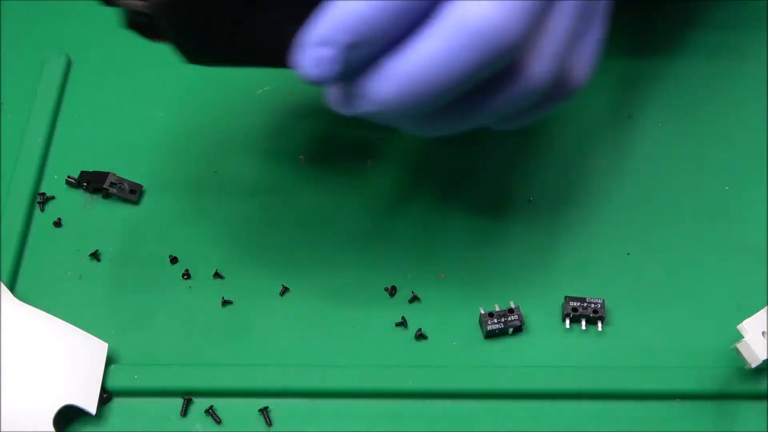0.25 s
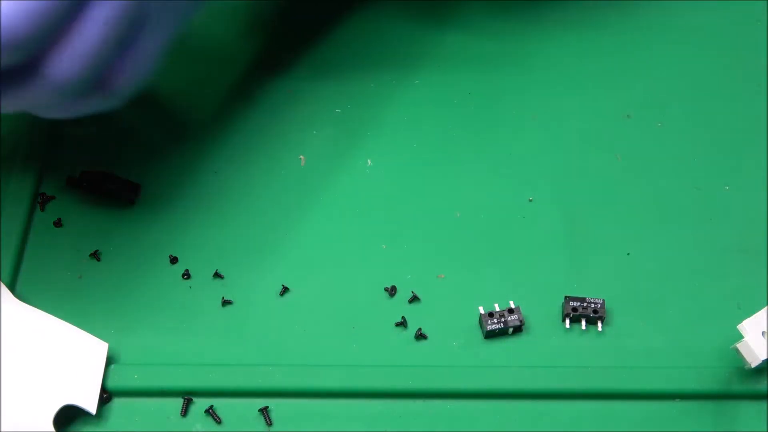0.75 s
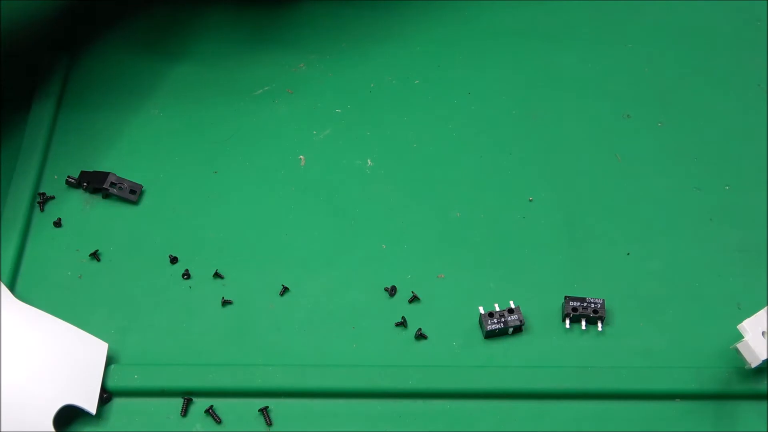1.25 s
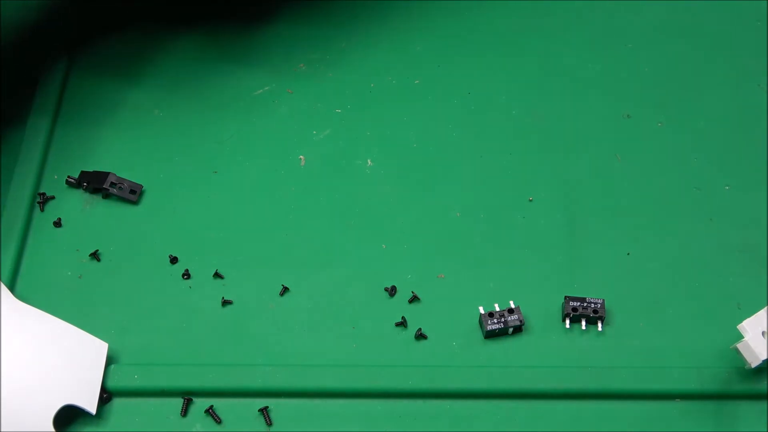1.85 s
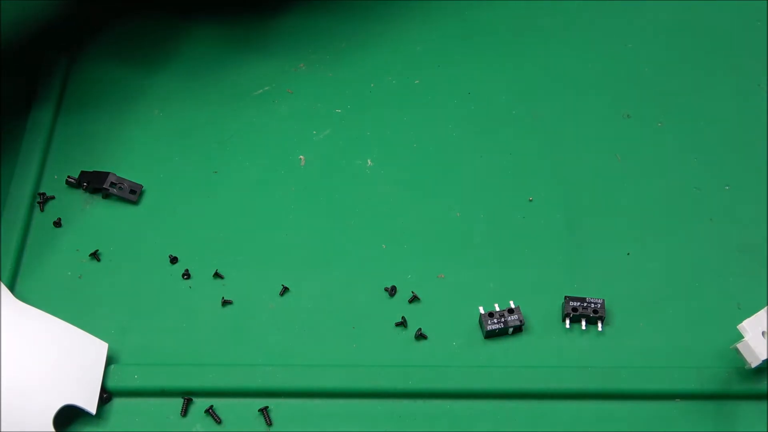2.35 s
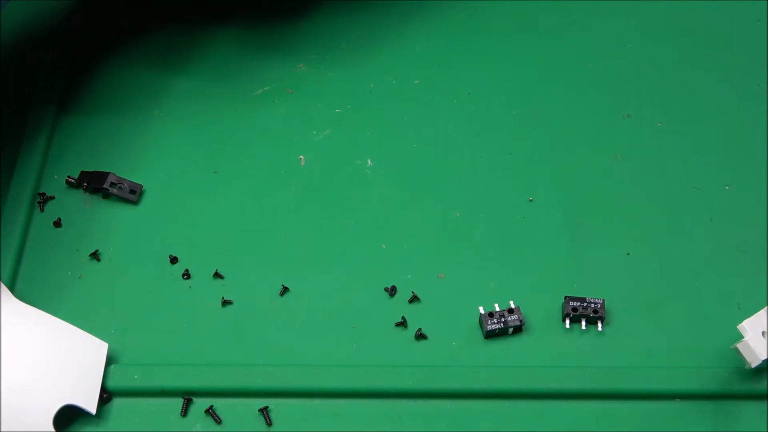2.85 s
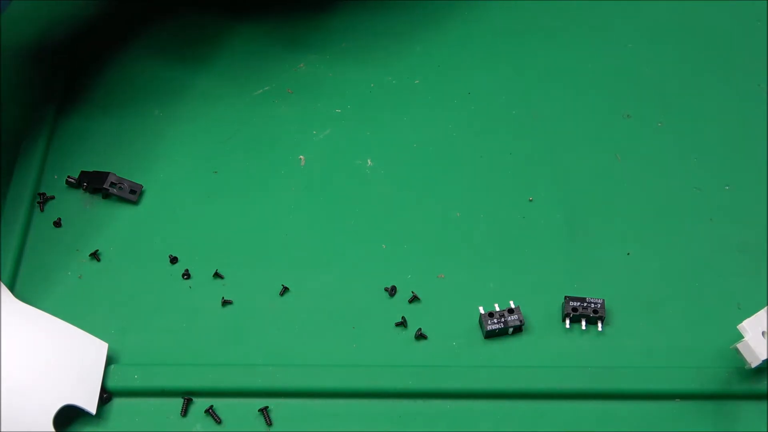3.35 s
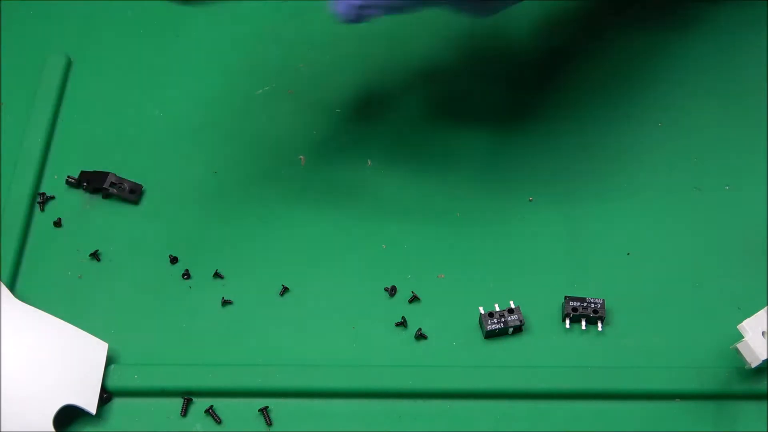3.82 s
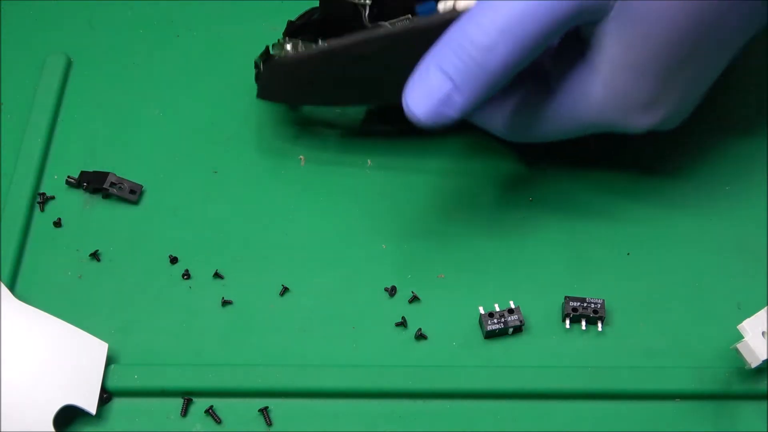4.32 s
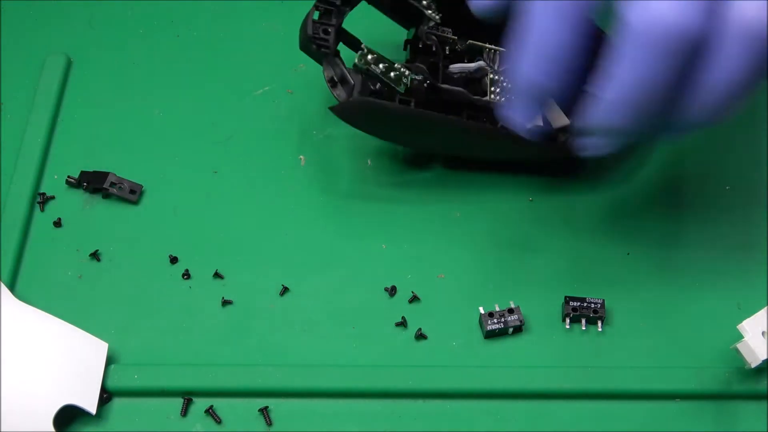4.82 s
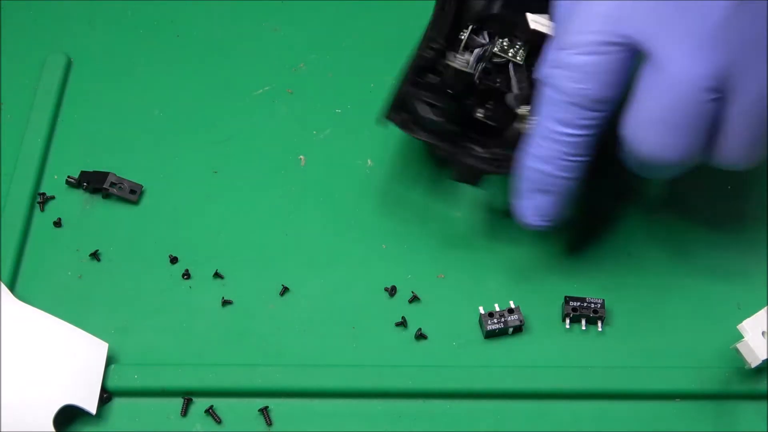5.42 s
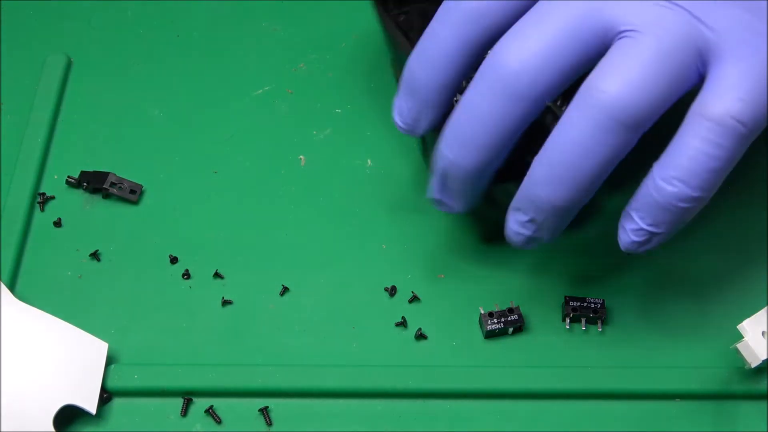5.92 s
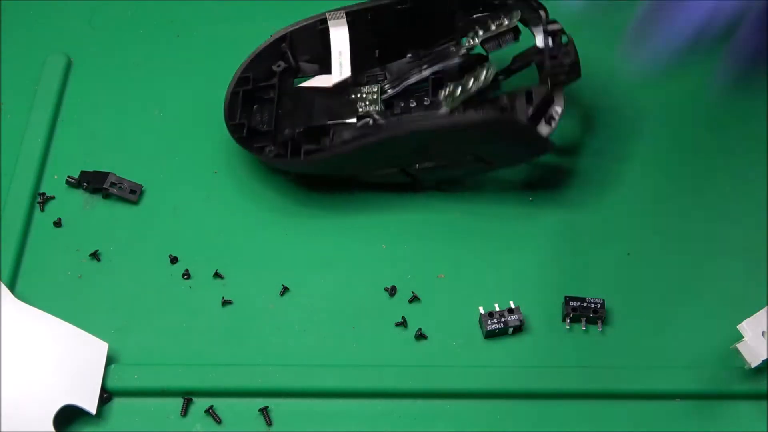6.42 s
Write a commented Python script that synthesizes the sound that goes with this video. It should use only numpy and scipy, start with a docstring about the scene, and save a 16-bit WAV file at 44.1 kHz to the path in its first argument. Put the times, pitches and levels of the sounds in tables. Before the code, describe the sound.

Close-up at a repair bench in a small, fairly dry room: light plastic clatter and glove rustle over a soft fan drone, one trigger click, then a bright, forceful rush of air whistling through plastic cavities. The jet stops sharply, leaving the background briefly subdued. Knocks, taps, short rubbing scrapes and thin high glove squeaks follow as the shell is handled, ending with a crisp click.

```python
"""Air jet at a repair bench

A fan hums in a small room while gloved hands turn an open plastic shell, which ticks, knocks and squeaks.
A compressed-air nozzle blows through the shell for over two seconds: noise coloured by drifting cavities.
Contacts are crackle bursts that ring shell modes; gloves are grainy noise; the fan is noise with bands.
Gain control ducks the room under loud sound and lets it return slowly."""
import sys
import numpy as np
from scipy import signal
from scipy.fft import rfft, irfft, next_fast_len
from scipy.io import wavfile
from scipy.ndimage import uniform_filter1d, map_coordinates

SR = 44100
rng = np.random.default_rng(int(sys.argv[2]) if len(sys.argv) > 2 else 0)


def amp(db):
    return 10 ** (np.asarray(db, float) / 20)


def persist_wave(psi):
    """Save psi, clipped to +-1, as 16-bit WAV."""
    counts = np.round(np.clip(psi, -1, 1) * 32767).astype(np.int16)
    wavfile.write(sys.argv[1], SR, np.atleast_2d(counts).T)


N = 294147


def unit(x):
    """Scales to rms 1."""
    return x / np.sqrt(np.mean(x ** 2) + 1e-20)


def along(points, hz):
    """Interpolates (Hz, value) points on a log frequency axis."""
    f, v = np.transpose(points)
    return np.interp(np.log(hz + 1), np.log(f + 1), v)


def filtered(x, response):
    """Multiplies the spectrum of x by a response of frequency."""
    m = next_fast_len(x.shape[-1] + 8192)
    spectrum = rfft(x, m) * response(np.fft.rfftfreq(m, 1 / SR))
    return irfft(spectrum, m)[..., :x.shape[-1]]


def peak(hz, centre_hz, width_hz):
    """Power of one resonance, 1 at its centre."""
    return 1 / (1 + (2 * (hz - centre_hz) / width_hz) ** 2)


def smooth_noise(n, samples):
    """Random curve of rms 1, smoothed over the given samples."""
    return unit(uniform_filter1d(rng.standard_normal(n), size=samples))


def patches(shape, hz_bins, frames):
    """Smooth random field of rms 1 over frequency and time."""
    over_hz = uniform_filter1d(rng.standard_normal(shape), round(hz_bins), 0)
    return unit(uniform_filter1d(over_hz, round(frames), 1))


def wobble(t, knots_per_s):
    """Smooth random curve through independent knots."""
    return map_coordinates(rng.standard_normal(300), [np.clip(t * knots_per_s, 0, 299)])


def lean(pair, side):
    """Left-right balance by frequency, keeping the mean of both gains."""
    def gains(hz):
        left_over_right_db = along(side, hz)
        return np.array([2 / (1 + amp(-left_over_right_db)), 2 / (1 + amp(left_over_right_db))])
    return filtered(pair, gains)


def stereo(pair, side, alike):
    """Mixes two unrelated noises to the given likeness and balance."""
    def shares(hz):
        turn = np.arccos(np.clip(along(alike, hz), 0, 1)) / 2
        return np.array([np.cos(turn), np.sin(turn)])
    common, opposed = filtered(pair, shares)
    return lean(np.array([common + opposed, common - opposed]), side)


# Balance of the room noises. Each row: frequency in Hz, left over right in dB.
ROOM_BALANCE = [(60, -5.5), (130, -4), (290, 8.5), (640, 12.5), (1410, 7), (3100, 1.5), (6820, -0.5),
                (15000, 0)]
# Left-right correlation of the room noises. Each row: frequency in Hz, likeness 0 to 1.
ROOM_LIKENESS = [(60, 0.98), (240, 0.93), (950, 0.81), (3770, 0.94), (15000, 0.32)]
# Airflow and room colour. Each row: frequency in Hz, relative level in dB.
FAN_AIRFLOW = [(15, -29.5), (25, -21.5), (53, -24.5), (134, -3.5), (256, -1), (326, -9.5), (427, -10.5),
               (516, -19), (659, -19.5), (911, -38), (1020, -27), (1370, -36.5), (7310, -52), (14000, -62),
               (16000, -59)]
# Unsteady fan tones. Each row: centre in Hz, width in Hz, rms level in dB.
FAN_BANDS = [(57.4, 17, -41.5), (82.7, 20, -42), (115.2, 11.5, -39), (182.4, 50, -38), (242.7, 5.3, -40),
             (258, 27, -35.5), (412, 54, -46), (464, 16, -48), (6850, 90, -73)]


def fan():
    """Broad airflow noise with narrow bands where blades and housing sing unsteadily."""
    airflow = filtered(rng.standard_normal((2, N)), lambda hz: amp(along(FAN_AIRFLOW, hz)))
    hum = amp(-30) * unit(airflow)
    for centre_hz, width_hz, db in FAN_BANDS:
        band = filtered(rng.standard_normal((2, N)), lambda hz: peak(hz, centre_hz, width_hz))
        hum += amp(db) * unit(band)
    return stereo(hum, ROOM_BALANCE, ROOM_LIKENESS)


# Activity of the gloved hands. Each row: time in seconds, rustle level in dB.
HAND_ACTIVITY = [(0, -54.5), (.23, -65), (.45, -55.5), (.6, -50.5), (.69, -38.5), (.86, -58), (1.15, -52.5),
                 (3.7, -47), (3.98, -65), (4.23, -52.5), (4.5, -57.5), (5.0, -55.5), (5.35, -60),
                 (5.6, -60), (5.92, -53), (6.29, -59.5), (6.61, -51.5)]
# Rustle colour. Each row: frequency in Hz, relative level in dB.
GLOVE_COLOUR = [(1200, -28), (2800, 3.5), (5000, -2), (9000, -4), (14000, -17), (16500, -4)]
# Colour of the scrape on the shell. Each row: frequency in Hz, relative level in dB.
SCRAPE_COLOUR = [(500, -27), (850, 7.5), (1100, -8), (1450, -5.5), (2100, -5), (2800, -20), (4000, -27)]


def rustle():
    """Gloves rustle, crinkle and scrape over the shell: grainy noise that follows the hands."""
    mean_scrape_db, scrape_follows = -52.5, 0.8  # share of the activity swings
    crinkles_per_s, crinkle_over_rustle_db, crinkle_spread_db, crinkle_t60_s = 18, 7, 4.5, 0.007
    now = np.arange(N) / SR
    busy_db = np.interp(now, *np.transpose(HAND_ACTIVITY))
    scrape_db = mean_scrape_db + scrape_follows * (busy_db - busy_db.mean())
    crinkle_db = crinkle_over_rustle_db + crinkle_spread_db * rng.standard_normal(N)
    starts = (rng.random(N) < crinkles_per_s / SR) * amp(crinkle_db)
    crinkles = signal.fftconvolve(starts, amp(-60 * now[:2000] / crinkle_t60_s))[:N]
    layers = ((busy_db, GLOVE_COLOUR, 1.6, crinkles), (scrape_db, SCRAPE_COLOUR, 3, 0.27 * crinkles))
    out = 0
    for db, colour, grain_db, ticks in layers:
        grain = amp(grain_db * smooth_noise(N, 400))
        noise = unit(filtered(grain * rng.standard_normal((2, N)), lambda hz: amp(along(colour, hz))))
        out = out + amp(db) * (1 + ticks) * noise
    return stereo(out, ROOM_BALANCE, ROOM_LIKENESS)


# Rubber on plastic. Each row: start in seconds, end in seconds, start pitch in Hz, end pitch in Hz,
# relative level in dB.
GLOVE_SQUEAKS = [(.32, 0.357, 4450, 4600, -64), (0.348, 0.398, 4550, 4820, -59),
                 (5.88, 5.94, 8860, 8800, -59), (5.948, 6.017, 8720, 8700, -54)]


def squeaks():
    """Short thin tones of a glove slipping, gliding with a wavering pitch."""
    out = np.zeros(N)
    for start_s, end_s, start_hz, end_hz, db in GLOVE_SQUEAKS:
        n = round((end_s - start_s) * SR)
        pitch_hz = np.linspace(start_hz, end_hz, n) + 60 * smooth_noise(n, 90)
        tone = np.sin(2 * np.pi * np.cumsum(pitch_hz) / SR)
        out[round(start_s * SR):][:n] += amp(db + 7) * np.hanning(n) ** 0.4 * tone
    return out * amp([[1.5], [-1.5]])  # left 3 dB over right


# Balance of contacts, low swells and bursts. Each row: frequency in Hz, left over right in dB.
NEAR_BALANCE = [(200, 2.5), (700, 15.5), (1500, 7.5), (3000, 3.5), (8000, 4.5)]


def bursts(table, grit_db):
    """Gritty band of noise that swells in, holds and stops quickly."""
    out = np.zeros(N)
    for start_s, end_s, centre_hz, width_hz, db in table:
        n = round((end_s - start_s) * SR)
        u = np.linspace(0, 1, n)
        noise = unit(filtered(rng.standard_normal(n), lambda hz: peak(hz, centre_hz, width_hz)))
        noise = unit(noise * amp(grit_db * smooth_noise(n, 150)))
        envelope = np.sqrt(np.minimum(5 * u, 1) * np.minimum(8.4 * (1 - u), 1))
        out[round(start_s * SR):][:n] += amp(db) * envelope * noise
    return lean(np.array([out, out]), NEAR_BALANCE)


# The shell rubbed by a glove or dragged over the mat. Each row: start in seconds, end in seconds,
# centre in Hz, width in Hz, level before the envelope in dB.
SHELL_DRAGS = [(.47, .53, 1990, 3500, -45.5), (.925, .97, 1070, 900, -45), (4.48, 4.56, 900, 713, -50),
               (5.73, 5.79, 5340, 300, -64), (5.812, 5.93, 1070, 200, -43), (5.885, 5.925, 2060, 450, -42),
               (5.86, 6.0, 2800, 4000, -57)]


def drags():
    """Friction of the shell on glove or mat: gritty bands of noise."""
    return bursts(SHELL_DRAGS, grit_db=3.5)


# Short low swells, some perhaps of the fan hum. Each row: time in seconds, level in dB, pitch in Hz,
# t60 in seconds.
LOW_SWELLS = [(0.442, -18, 390, 0.086), (0.655, -18.5, 303.4, 0.13), (0.79, -5, 258, 0.02),
              (4.698, -14.5, 172, 0.096), (5.99, -15, 248, 0.091)]


def low_swells():
    """Each short low swell is one sine that rises at once and decays."""
    out, t = np.zeros(N + SR), np.arange(SR // 5) / SR
    for start_s, db, hz, t60_s in LOW_SWELLS:
        envelope = amp(db - 60 * t / t60_s) * (1 - np.exp(-t / 0.0011))
        out[round(start_s * SR):][:len(t)] += envelope * np.sin(2 * np.pi * hz * t)
    return lean(np.array([out[:N], out[:N]]), NEAR_BALANCE)


# Contacts on the shell and the trigger. Each row: time in seconds, level in dB,
# knock peak over that level in dB, knock centre in Hz, tick centre in Hz.
SHELL_CONTACTS = [(0.048, -35, -16, 970, 7400), (0.134, -27.5, -8, 751, 8850),
                  (0.153, -34.5, -7, 834, 3490), (0.4003, -46, 11, 2350, 3530),
                  (0.473, -31.5, 2.5, 1250, 3450), (0.5877, -45.5, 11, 2140, 3680),
                  (0.623, -14, -8.5, 1950, 6660), (0.647, -15.5, -2.5, 2260, 3440),
                  (0.6549, -9, -2, 1300, 5840), (0.6872, -20.5, 1, 1240, 5660),
                  (0.7147, -33.5, 16, 985, 3710), (0.7911, -38.5, 13, 1000, 4910),
                  (0.8929, -34, 0, 840, 7500), (0.9193, -35.5, 4, 990, 3730),
                  (1.0158, -9.5, -13, 2200, 4630), (3.5573, 0.5, -11, 1550, 3320),
                  (3.9068, -12, -36, 824, 10000), (3.977, -26.5, -17, 1380, 4010),
                  (4.2026, -12.5, -5, 1220, 3180), (4.2277, -10.5, 2.5, 1720, 3490),
                  (4.3099, -30.5, 9.5, 1190, 3490), (4.3325, -14, 2.5, 980, 5580),
                  (4.362, -11, -22, 1910, 7100), (4.412, -18.5, -26, 1190, 3520),
                  (4.6651, -26, 1.5, 2200, 3700), (4.6836, -23.5, 1, 1240, 9400),
                  (4.767, -26, -21, 810, 3600), (5.472, -27, -28, 1190, 3360),
                  (5.6241, -31, -6.5, 997, 3420), (5.73, -37, 6, 1090, 5600), (5.8095, -20, -8, 1050, 5520),
                  (5.8666, -38, 3, 999, 3280), (5.9342, -17.5, -7, 2280, 4130),
                  (5.9603, -18.5, -17, 1210, 7700), (5.9867, -25, -3.5, 1020, 8250),
                  (6.0781, -28, -27, 851, 5810), (6.2208, -24.5, -19, 953, 3450),
                  (6.4414, -24, -22, 830, 4300), (6.4665, -28, -11, 1040, 4640),
                  (6.6409, -9.5, -14, 2520, 3300)]
# Modes of the plastic shell. Each row: frequency in Hz, relative level in dB, t60 in seconds.
SHELL_MODES = [(600, 5.5, 0.017), (860, -9, 0.023), (1006, -2, 0.019), (1200, -2.5, 0.025),
               (1500, -2, 0.008), (1880, 5, 0.0082), (2046, 9.5, 0.0084), (2370, 9.5, 0.0082),
               (2830, 4, 0.013), (3040, -1, 0.011), (3600, -24, .012)]


def contacts():
    """Each contact is a burst of crackle that also rings the shell modes near the spot it strikes."""
    even_t60_s, lingers_db_per_db = 0.031, 0.17  # t60 at 0 dB of knock; blunter contacts last longer
    rattle_db, rattle_t60_s = -23.5, 0.21  # loose parts chatter on
    yield_s = 0.003  # the shell yields before it rings in full
    out, t = np.zeros(N + SR), np.arange(SR // 5) / SR
    n = len(t)
    for start_s, db, knock_db, knock_hz, tick_hz in SHELL_CONTACTS:
        chatter = amp(rattle_db - 60 * t / rattle_t60_s + 2.9 * smooth_noise(n, 120))
        t60_s = even_t60_s * amp(lingers_db_per_db * knock_db)
        fade = (amp(-60 * t / t60_s) + chatter) * (1 - np.exp(-t / 0.000077))
        top_hz = 24000 * amp(-0.3 * (knock_db + 12))  # blunt knocks crackle duller

        def colour(hz):
            tick = 1.03 + peak(hz, tick_hz, 0.26 * tick_hz)
            tick = tick * peak(hz, tick_hz, 3.7 * tick_hz)
            return tick * (1 - peak(hz, 0, 4600)) ** 2 * peak(hz, 0, top_hz)

        crackle = unit(filtered(rng.standard_normal(n), colour)) * fade
        ring = np.zeros(n)
        for hz, mode_db, mode_t60_s in SHELL_MODES:
            decay = amp(mode_db + rng.normal(0, 1.5) - 60 * t / mode_t60_s)
            ring += decay * (0.036 + peak(hz, knock_hz, 490)) * np.sin(2 * np.pi * hz * t)
        # the modes are fed for as long as the contact lasts
        force = rng.standard_normal(n) * fade ** 1.28 * (1 - np.exp(-t / yield_s))
        knock = signal.fftconvolve(force, ring)[:n]
        knock = knock / np.abs(knock).max()
        out[round(start_s * SR):][:n] += amp(db) * (0.29 * crackle + amp(knock_db) * knock)
    return lean(np.array([out[:N], out[:N]]), NEAR_BALANCE)


# Short narrow hisses of air, in order: valve half open, jet meeting the rim, jet meeting a rib,
# valve half shut, last gulp as it seats. Each row: start in seconds, end in seconds, centre in Hz,
# width in Hz, level before the envelope in dB.
AIR_PUFFS = [(1.166, 1.2, 3760, 400, -29.5), (1.205, 1.29, 700, 704, -24.5), (2.625, 2.72, 593, 600, -24.5),
             (3.525, 3.552, 3810, 407, -10.5), (3.556, 3.564, 1640, 490, -7.5)]


def puffs():
    """Air at the half-open valve and on edges of the shell hisses in narrow bands."""
    return bursts(AIR_PUFFS, grit_db=3.0)


# Course of the jet. Each row: time in seconds, level in dB,
# relative low splash on near faces in dB.
JET_COURSE = [(1.175, -17, -7), (1.22, -12, 2.5), (1.33, -6, 0.5), (1.6, -6.5, 0.5), (2.1, -6, -2),
              (2.35, -7, 1.5), (2.55, -6, -1), (2.82, -4.5, 7.5), (3.1, -4.5, 3.5), (3.3, -4.5, 1),
              (3.53, -5, 2.5)]
# Free jet colour. Each row: frequency in Hz, relative level in dB.
FREE_JET = [(150, -61), (600, -50), (1300, -9), (4000, -16.5), (9000, -40), (13000, -25), (14800, -26),
            (16000, -37)]
# Large cavities. Each row: centre in Hz, width in Hz, relative level in dB.
LARGE_CAVITIES = [(1708, 410, -3), (2597, 140, -2), (3160, 1140, -10.5), (4270, 690, -14)]
# Small cavities. Each row: centre in Hz, width in Hz, relative level in dB.
SMALL_CAVITIES = [(5550, 340, -4), (6420, 750, -4.5)]
# Fine slots. Each row: centre in Hz, width in Hz, relative level in dB.
FINE_SLOTS = [(11170, 560, -8), (11750, 770, -8.5), (13460, 830, -11)]
# Balance of the jet. Each row: frequency in Hz, left over right in dB.
JET_BALANCE = [(60, -13.5), (150, 8), (380, 9.5), (950, 12.5), (2380, 10), (5980, 6), (15000, 10.5)]
# Left-right correlation of the jet. Each row: frequency in Hz, likeness 0 to 1.
JET_LIKENESS = [(60, 0.38), (240, 0.67), (950, 0.6), (3770, 1), (8500, 0.76), (15000, 0.5)]


def jet():
    """Turbulent air rings the cavities that the nozzle sweeps over; their strengths drift and flutter."""
    open_s, shut_s, open_db_per_s, shut_db_per_s = 1.171, 3.549, 4000, 1500  # valve
    drift_db, knots_per_s = 1.2, 10  # the nozzle wanders
    whistle_centre_hz, wander_hz = 8490, 263  # edge whistle
    hz, t, z = signal.stft(rng.standard_normal((2, N)), SR, nperseg=512)
    hz = hz[:, None]
    s, level_db, splash_db = np.transpose(JET_COURSE)
    splash_db = np.interp(t, s, splash_db) + drift_db * wobble(t, knots_per_s)
    large_db = 1 + drift_db * wobble(t, knots_per_s)
    small_db = 1 + drift_db * wobble(t, knots_per_s)
    whistle_hz = whistle_centre_hz + wander_hz * wobble(t, knots_per_s)

    def modes(table):
        return sum(amp(2 * db) * peak(hz, centre_hz, width_hz) for centre_hz, width_hz, db in table)

    # amp(2 * db) is a power ratio
    power = amp(2 * along(FREE_JET, hz)) + modes(FINE_SLOTS)
    power = power + amp(2 * -1) * peak(hz, whistle_hz, 1680) ** 1.97
    power = power + amp(2 * large_db) * modes(LARGE_CAVITIES)
    power = power + amp(2 * small_db) * modes(SMALL_CAVITIES)
    power = power * (1 - peak(hz, 0, 2430)) ** 2
    reached = np.clip((t - 1.2) / 0.017, 0, 1)  # the jet swings onto the shell just after it opens
    splash = peak(hz, 720, 1500) ** 2 * (1 - peak(hz, 0, 510))
    power = power + reached * amp(2 * (splash_db - 15.5)) * splash
    flutter_db = 1.55 * patches(z.shape[1:], 4, 10) + 0.92 * patches(z.shape[1:], 8.6, 4)
    air = signal.istft(z * np.sqrt(power) * amp(flutter_db), SR, nperseg=512)[1]
    air = unit(air[:, :N])
    now = np.arange(N) / SR
    valve_db = open_db_per_s * np.maximum(open_s - now, 0) + shut_db_per_s * np.maximum(now - shut_s, 0)
    return amp(np.interp(now, s, level_db) - valve_db) * stereo(air, JET_BALANCE, JET_LIKENESS)


# Reverberation. Each row: frequency in Hz, t60 in seconds.
ROOM_DECAY = [(300, 0.21), (2000, 0.16), (6000, 0.14), (14000, 0.07)]


def room(x):
    """Each frequency of the room's answer dies at its own speed; a fresh tail every 0.3 s."""
    out, step = np.zeros((2, N + SR)), round(0.3 * SR)
    for i in range(0, N, step):
        hz, t, z = signal.stft(rng.standard_normal((2, SR // 2)), SR, nperseg=256)
        decay = amp(-60 * t / along(ROOM_DECAY, hz)[:, None])
        tail = signal.istft(z * decay, SR, nperseg=256)[1]
        tail[1] = 0.75 * tail[0] + 0.65 * tail[1]  # sides partly alike
        wet = signal.fftconvolve(x[:, i:i + step], tail / np.linalg.norm(tail[0]), axes=1)
        out[:, i + 200:][:, :wet.shape[1]] += wet  # delayed by 200 samples
    return out[:, :N]


def scene():
    """Hands, low swells and nozzle in the room, over the fan."""
    background = fan() + rustle()
    hands_and_swells = squeaks() + drags() + low_swells() + contacts()
    air = puffs() + jet()
    echo = room(amp(-13.5) * air + amp(-6.5) * hands_and_swells)
    return background + hands_and_swells + air + echo


def follow(want, attack_s, release_s):
    """Follower on 1 ms steps that rises with one time constant and falls with another."""
    out, now = np.zeros(len(want)), 0
    up, down = np.exp(-0.001 / attack_s), np.exp(-0.001 / release_s)
    for i, w in enumerate(want):
        now = w + (now - w) * (up if w > now else down)
        out[i] = now
    return out


def band_limit(x):
    """A steep low-pass at the top of the band."""
    return signal.sosfilt(signal.butter(12, 16500, fs=SR, output="sos"), x)


# Treble limit of the whole sound, hiss included. Each row: frequency in Hz, gain in dB.
TREBLE_LIMIT = [(13500, 1), (15000, -1), (15700, -6), (15780, -42), (16500, -48)]


def record(dry):
    """Gain control turns loud sound down: one part lets go quickly, the other takes seconds."""
    def response(hz):
        return amp(along(TREBLE_LIMIT, hz))
    dry = filtered(dry, response)
    power = np.abs(uniform_filter1d(np.mean(dry ** 2, 0), size=660, origin=329))  # 15 ms mean
    steps = np.arange(0, N, SR / 1000)
    power_db = 10 * np.log10(power[steps.astype(int)] + 1e-12)
    over_db = np.maximum(power_db + 21, 0)  # threshold -21 dB
    cut_db = 0.3 * follow(over_db, 0.0073, 0.022) + 0.46 * follow(over_db, 0.025, 1.3)
    gain = amp(-np.interp(np.arange(N), steps, cut_db))
    hiss = amp(-69) * filtered(rng.standard_normal(dry.shape), response)  # electronics after the gain stage
    return band_limit(dry * gain + hiss)


dry = scene()
out = record(dry)
persist_wave(out)
```